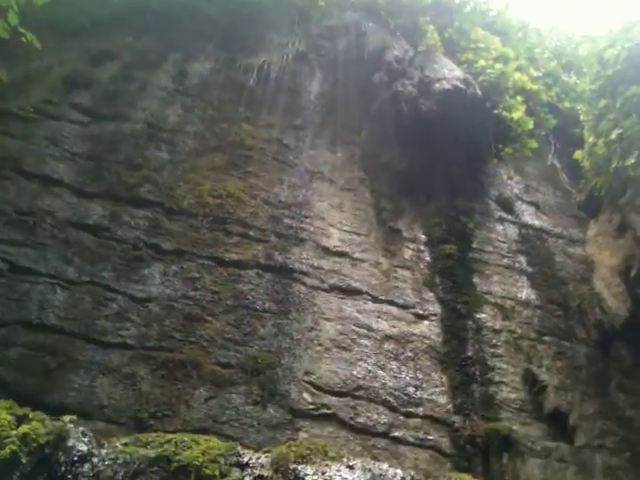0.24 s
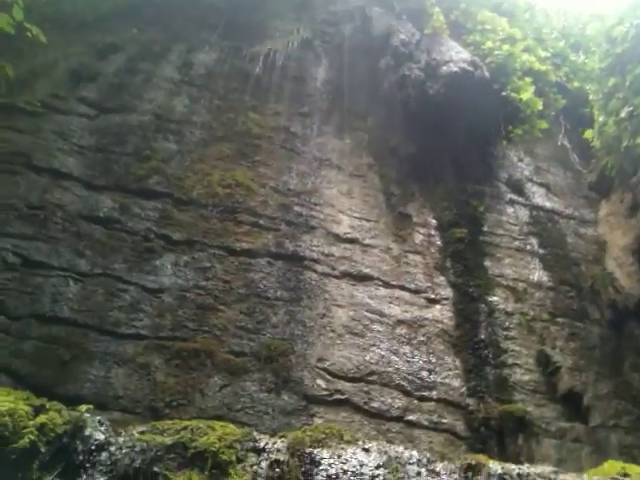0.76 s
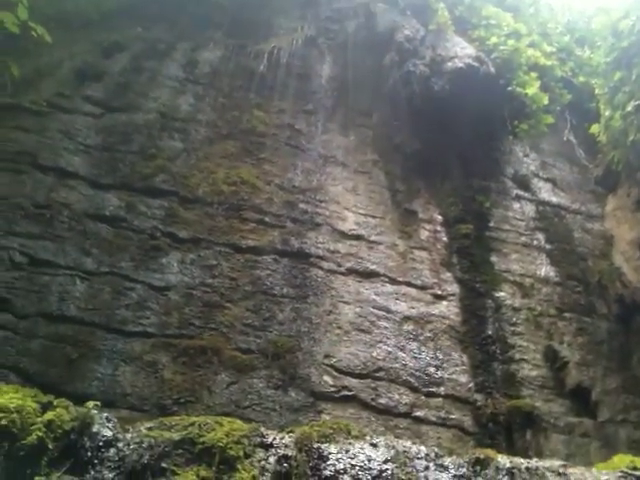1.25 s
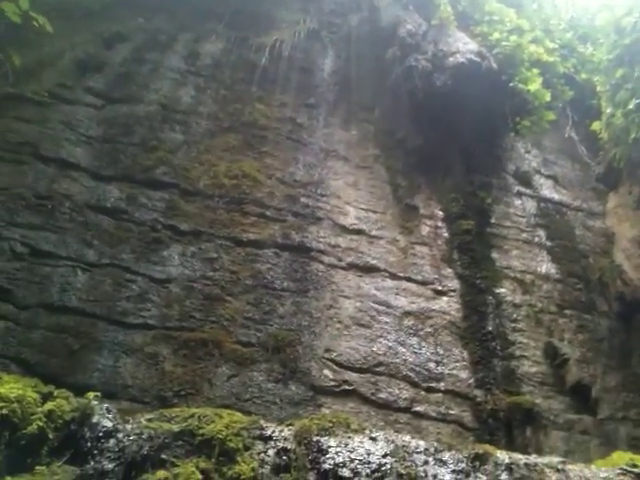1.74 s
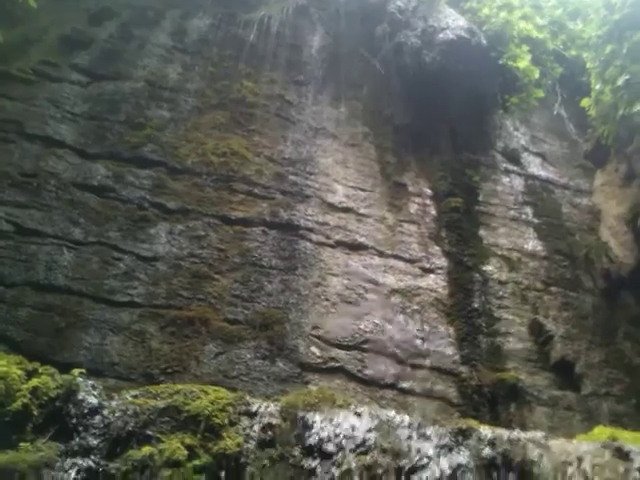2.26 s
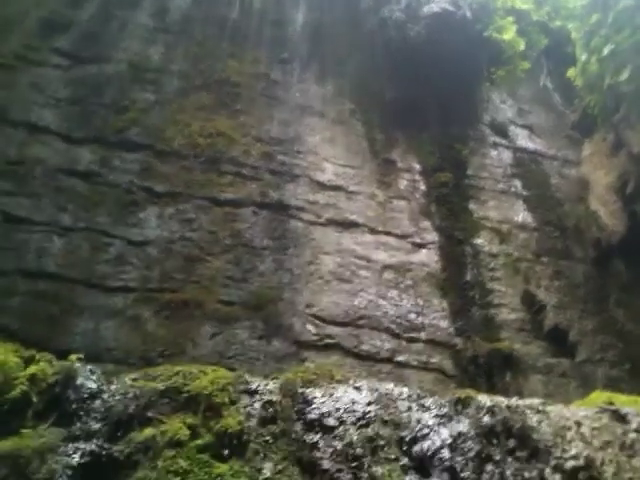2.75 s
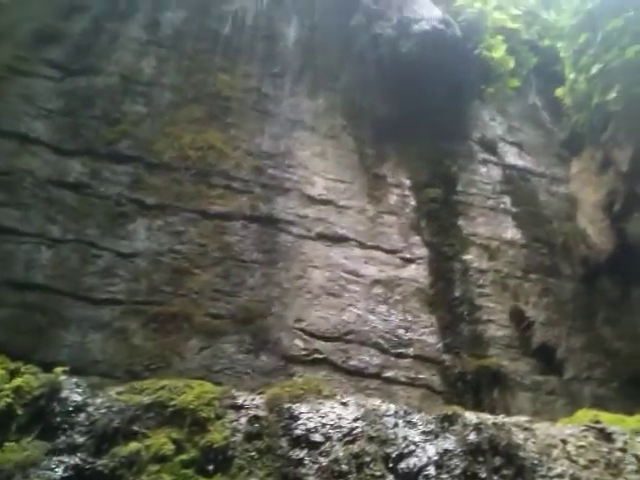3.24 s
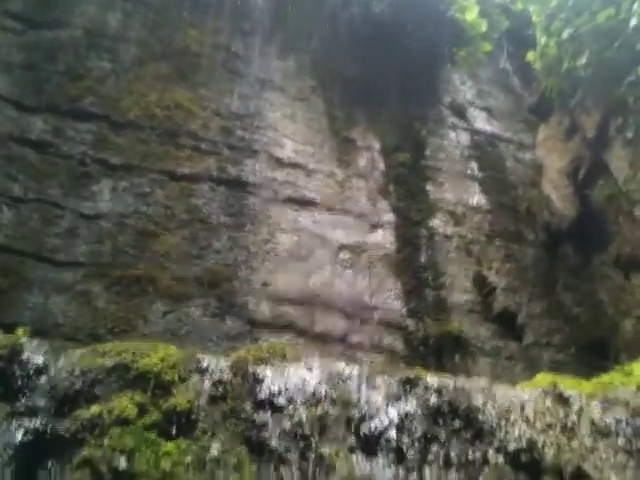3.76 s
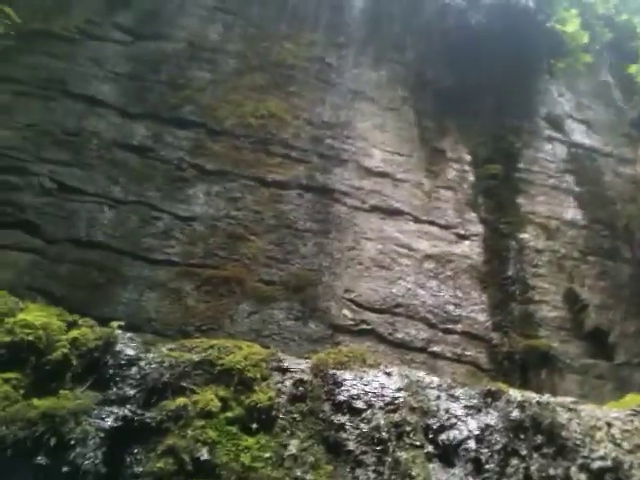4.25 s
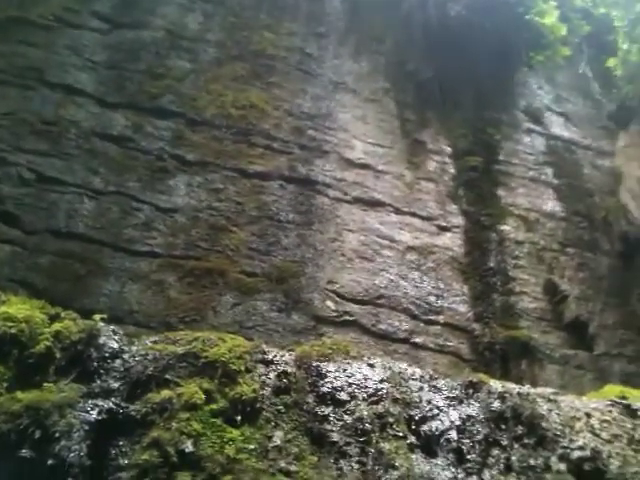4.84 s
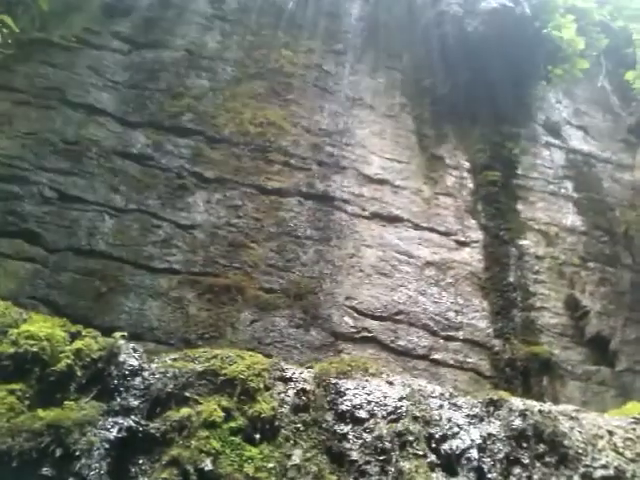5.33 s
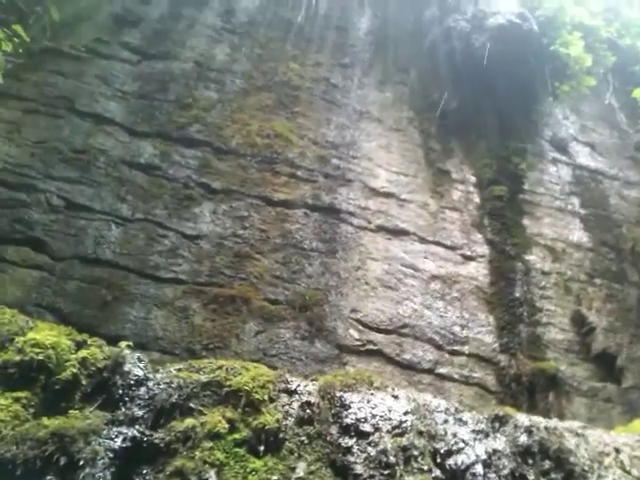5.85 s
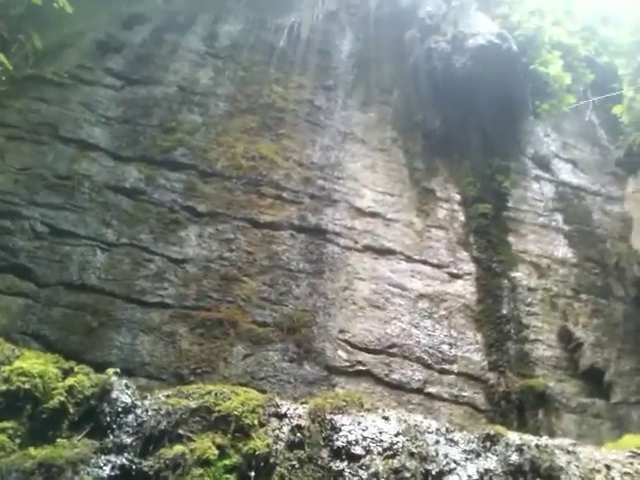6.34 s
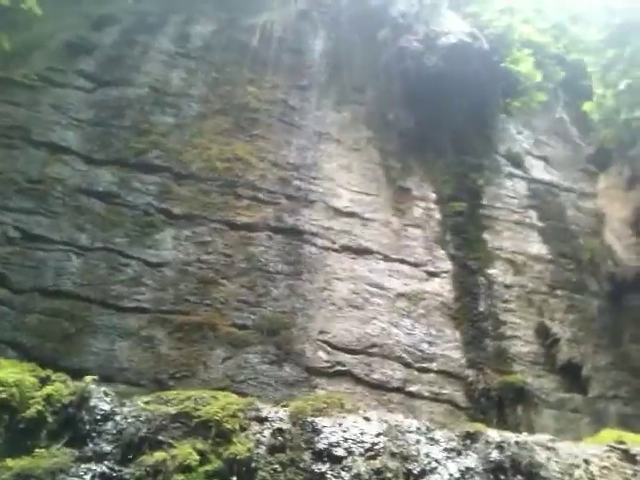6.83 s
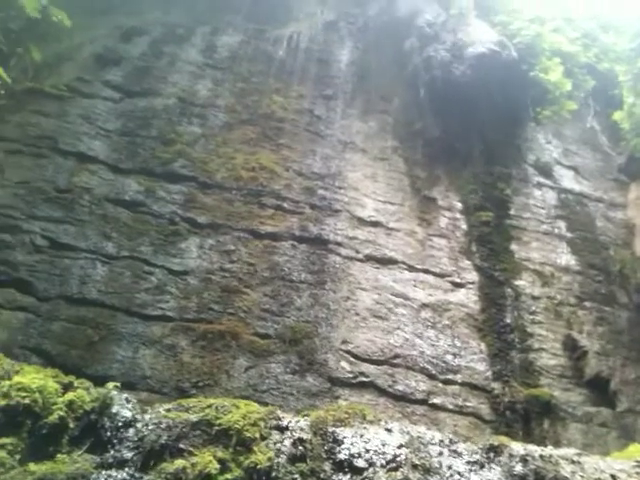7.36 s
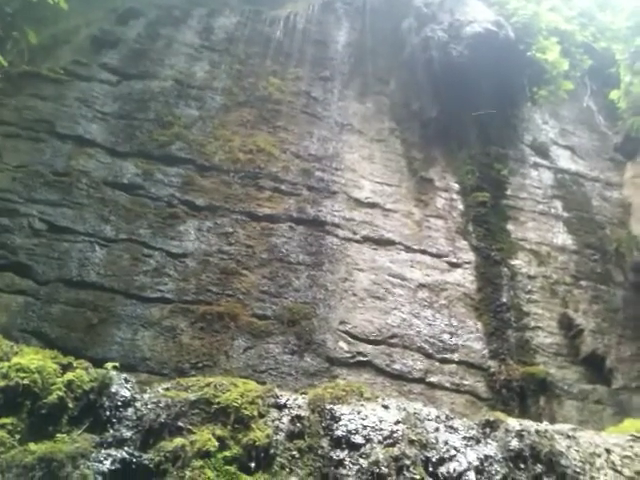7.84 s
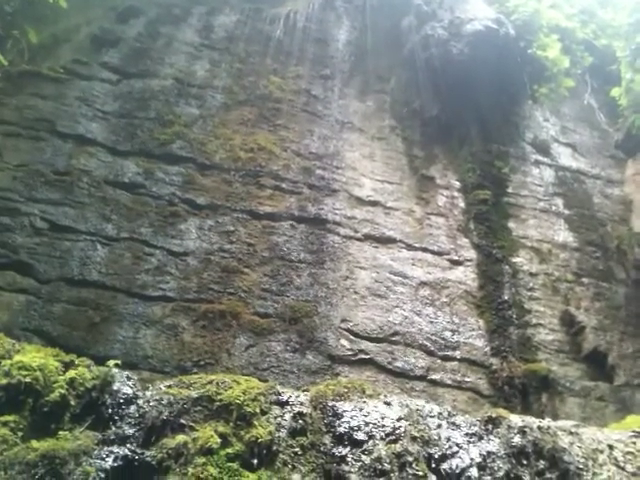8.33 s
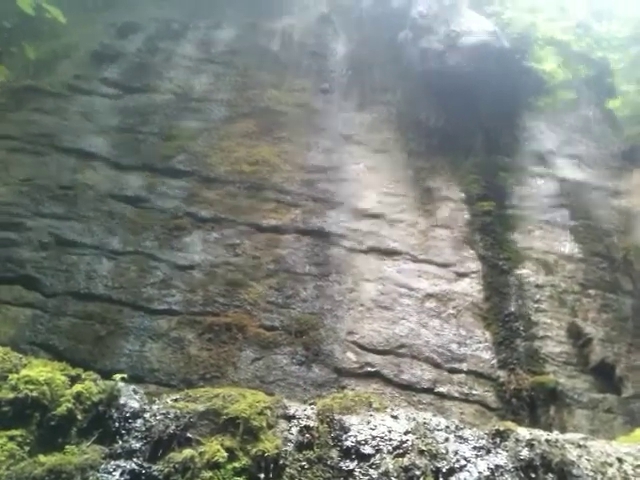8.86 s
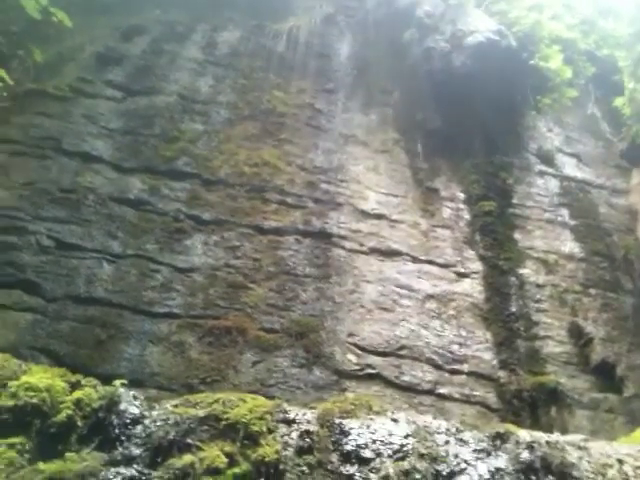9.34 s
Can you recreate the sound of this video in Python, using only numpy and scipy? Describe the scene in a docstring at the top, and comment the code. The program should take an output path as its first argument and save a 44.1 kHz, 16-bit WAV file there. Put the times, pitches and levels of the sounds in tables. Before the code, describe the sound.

Thin streams of water fall from a mossy overhang onto rocks outdoors, heard close on a hand-held microphone. For the whole nine and a half seconds, countless droplets merge into a steady, bright, lightly fluttering hiss over a faint duller wash. Nearer drops splash crisply, plop irregularly into shallow hollows and leave tiny pinging bubbles. The hiss shifts slightly in tone and swells a little around 4 seconds as the microphone turns. A very light drop touches the microphone at 3.8 seconds. Five heavy drops then strike it at about 4.5, 6.5, 7.5, 8.9 and 9.3 seconds, each a sharp tick with a short, dull thump, far louder than the water. From 5 seconds on, the runoff gives a few faint, brief gurgles, while the splashing and dripping carry on to the end.

```python
"""Outdoors, thin streams fall from a mossy overhang onto rocks, heard on a hand-held mono microphone.
From the start countless droplets merge into a hiss; nearer drops splash, plop into shallow hollows and
leave ringing bubbles. The hiss changes colour as the microphone sinks toward a ledge and, near 4 s, turns.
One light drop lands on the housing at 3.8 s and five heavy ones follow, each a tick and a dull thump.
From 5 s on the runoff gurgles now and then."""
import sys
import numpy as np
from scipy import signal
from scipy.fft import rfft, irfft, next_fast_len
from scipy.io import wavfile

SR = 44100
rng = np.random.default_rng(int(sys.argv[2]) if len(sys.argv) > 2 else 0)


def pcm_store(signal):
    """Save signal as 16-bit PCM."""
    levels = np.round(np.clip(np.atleast_2d(signal), -1, 1) * 32767)
    wavfile.write(sys.argv[1], SR, levels.astype(np.int16).T)


N = 422919
TIME = np.arange(N) / SR
FREQS = np.maximum(np.arange(N // 2 + 1) * SR / N, 1)


def hiss(droplets_per_s=8000, size_db=2.5, flutter_db=1.92, patchy_db=1.0):
    """Droplets click on the rocks over a blur of far ones; each register follows the flow and flutters."""
    # colour of the hiss: (f/Hz, relative level/dB)
    colour = [(700, -29), (1200, -41), (1400, -9.5), (1750, -5.5), (2400, -2.5), (3350, -4), (4300, -3),
              (5100, -1.5), (5750, -0.8), (6550, 0), (8300, -0.4), (10300, -4), (12800, -6), (15600, -10)]
    # registers: (centre f/Hz, share of the flow's swing, gain at the ledge/dB, gain when turned/dB)
    registers = [(2780, 0.59, -2.5, 1), (3700, 0.56, 1, -6), (6440, 0.72, 0, -3.5), (8150, 0.48, 0.5, 1.5),
                 (10000, 0.22, -1.5, -2.5)]
    sizes = from_db(size_db * np.minimum(rng.exponential(1, N), 4)) * rng.choice([-1, 1], N)
    clicks = rms_one(sizes * (rng.random(N) < droplets_per_s / SR))
    spectrum = rfft(coloured(clicks + rng.standard_normal(N), colour))
    centres = [hz for hz, *_ in registers]
    flutter = flutter_db * drift(13)
    out = np.zeros(N)
    for (_, share, ledge_db, turned_db), weights in zip(registers, np.eye(len(registers))):
        band = irfft(spectrum * np.interp(np.log(FREQS), np.log(centres), weights), N)
        flicker = from_db(share * flutter + patchy_db * drift(22))
        out += band * gain_at_microphone(share, ledge_db, turned_db) * flicker
    return out


def splashes(per_s=70, level_db=-55.5, centre_hz=4900, scatter=0.31, near_width_hz=2070):
    """A drop shatters on rock and throws a brief burst of spray with a colour of its own."""
    # splashes close to the microphone: (t/s, level/dB, length/s, centre f/Hz)
    near_splashes = [(0.433, -44.5, 0.021, 6600), (0.532, -42, 0.0059, 5700), (0.673, -50, .003, 6050),
                     (0.727, -45, 0.005, 1490), (0.97, -44, 0.0026, 5470), (1.097, -43, .003, 4700),
                     (1.255, -43.5, 0.017, 4900), (1.592, -44, .004, 2320), (1.637, -48, 0.013, 3900),
                     (1.776, -43, 0.0042, 5140), (1.797, -41, .002, 4000), (1.96, -42, 0.0027, 6200),
                     (2.099, -46, .004, 5000), (2.268, -50, 0.0073, 1450), (2.353, -43, 0.0053, 1600),
                     (2.293, -42, 0.0061, 5000), (2.35, -43.5, 0.0042, 5500), (3.92, -44.5, .012, 3800),
                     (4.114, -46.5, 0.021, 4230), (4.195, -42, 0.013, 7300), (4.199, -46, .012, 5000),
                     (4.265, -42.5, 0.0048, 2500), (4.582, -41, .003, 7700), (5.110, -40.5, 0.0025, 6770),
                     (5.26, -41.5, 0.0036, 2000), (5.366, -44, 0.016, 2470), (5.513, -39.5, 0.0022, 2890),
                     (5.835, -41, 0.0069, 6300), (6.114, -47, 0.0037, 5050), (7.072, -38.5, 0.0026, 6460),
                     (7.490, -42, .006, 6070), (7.497, -43, 0.018, 7500), (7.779, -42, 0.0037, 6570),
                     (7.822, -42.5, 0.017, 7300), (8.359, -40, .003, 6360), (8.494, -40, 0.0044, 6400),
                     (9.093, -40, 0.0027, 6200), (9.56, -39.5, 0.023, 6800)]
    out = np.zeros(N)
    for s, db, higher, longer in random_drops(per_s, spread_db=3.0):
        spray = burst(centre_hz * np.exp(scatter * higher), octaves=0.14, length_s=0.003 * 1.6 ** longer)
        add(out, s, from_db(level_db + db) * spray)
    for s, db, length_s, hz in near_splashes:
        add(out, s, from_db(db) * burst(hz, near_width_hz / hz, length_s))
    return out


def plops(scatter=0.068):
    """Drops plunge into water-filled hollows, each with its own range of pitch; near ones stand out."""
    # drops close by: (t/s, level/dB, f/Hz)
    near_drips = [(0.028, -49, 824), (0.097, -51, 850), (0.160, -52, 817), (0.238, -54, 497),
                  (0.242, -45, 880), (0.2905, -42, 826), (0.3483, -48, 814), (0.396, -46, 760),
                  (0.444, -47, 780), (0.507, -49, 816), (0.5243, -43, 830), (0.551, -48, 890),
                  (0.5915, -42, 815), (0.637, -54, 845), (0.73, -39.5, 1110), (0.901, -46, 820),
                  (0.93, -43.5, 1000), (0.969, -44.5, 1030), (1.001, -45.5, 820), (1.043, -48, 761),
                  (1.093, -50, 991), (1.171, -42.5, 860), (1.197, -49, 933), (1.231, -51, 949),
                  (1.251, -47, 725), (1.353, -47, 814), (1.551, -50, 792), (1.6224, -36, 820),
                  (1.6613, -43, 860), (1.734, -49, 856), (1.775, -48, 848), (1.8022, -47, 800),
                  (1.865, -49, 865), (1.9885, -42.5, 825), (2.055, -55, 468), (2.064, -50, 794),
                  (2.1367, -45, 830), (2.3153, -47, 800), (2.3518, -41.5, 790), (2.416, -46, 935),
                  (2.430, -48, 834), (2.476, -45.5, 890), (2.5115, -40.5, 800), (2.6646, -42.5, 800),
                  (2.679, -51, 816), (2.697, -44.5, 796), (2.7355, -46.5, 835), (2.79, -48.5, 814),
                  (2.891, -45, 1090), (3.07, -48, 480), (3.0755, -43.5, 764), (3.424, -51, 1092),
                  (3.5825, -46, 810), (3.6495, -43, 775), (3.688, -51, 790), (3.7253, -46.5, 815),
                  (3.750, -47.5, 1000), (3.9345, -47.5, 885), (4.027, -46.5, 966), (4.134, -44, 990),
                  (4.225, -44.5, 910), (4.2465, -47.5, 760), (4.327, -47.5, 484), (4.340, -48, 761),
                  (4.3653, -44, 840), (4.4315, -45, 760), (4.541, -46, 800), (4.6855, -49, 810),
                  (4.733, -48, 779), (4.809, -46, 722), (4.925, -46.5, 992), (5.106, -50, 800),
                  (5.2928, -41, 850), (5.392, -45.5, 795), (5.615, -52, 859), (5.725, -48, 830),
                  (5.766, -49, 742), (5.808, -40.5, 920), (5.844, -40.5, 850), (5.875, -41.5, 790),
                  (5.899, -42.5, 814), (6.374, -48, 778), (6.392, -52, 792), (6.408, -49.5, 530),
                  (6.4145, -42, 880), (6.438, -46, 980), (6.4875, -44, 843), (7.245, -48, 920),
                  (7.335, -52.5, 500), (7.340, -45, 1000), (7.5005, -42.5, 910), (7.669, -48, 1081),
                  (7.6935, -47, 780), (7.883, -46, 885), (7.9515, -44, 830), (7.9775, -46, 856),
                  (8.007, -47, 876), (8.318, -47.5, 497), (8.3237, -41.5, 820), (8.4812, -43, 830),
                  (8.5665, -46, 830), (8.602, -48, 798), (8.636, -47, 795), (8.690, -47, 1100),
                  (8.727, -46.5, 450), (8.890, -47.5, 856), (8.928, -44, 1083), (9.044, -51, 483),
                  (9.0525, -47.5, 820), (9.181, -51, 867), (9.2075, -48, 790), (9.224, -48, 848),
                  (9.252, -42, 890), (9.569, -46, 786)]
    # hollows in the rock: (f/Hz, level/dB, drops per second)
    hollows = [(461, -64, 40), (816, -57, 44), (1100, -56.5, 18), (1506, -55.5, 17)]
    out = np.zeros(N)
    for s, db, hz in near_drips:
        add(out, s, from_db(db) * plop(hz))
    for hz, level_db, per_s in hollows:
        for s, db, higher, _ in random_drops(per_s, spread_db=2.5):
            add(out, s, from_db(level_db + db) * plop(hz * np.exp(scatter * higher)))
    return out


def plop(hz, cycles=1.32, slap_db=-8.5):
    """A drop slaps shallow water and its cavity rings a low, quickly damped note; no two are alike."""
    longer, wetter = np.clip(rng.standard_normal(2), -1.5, 1.5)
    note = ring(hz, cycles * np.exp(0.17 * longer), rise=0.0025)
    slap = from_db(slap_db + 0.5 * wetter) * burst(hz, octaves=0.69, length_s=0.0035)
    out = np.zeros(max(len(note), len(slap)))
    add(out, 0, note)
    add(out, 0, slap)
    return out


def bubbles(per_s=130, level_db=-53, centre_hz=2300, scatter=0.177, rise=0.013):
    """Air pockets patter in the runoff and ping close by, rising in pitch as they near the surface."""
    # bubbles close by: (t/s, peak level/dB, f/Hz, cycles to ring up)
    near_bubbles = [(0.199, -42, 2550, 4.5), (0.729, -45, 1510, 3.7), (0.942, -47, 4910, 4),
                    (0.9705, -36, 5370, 3.9), (0.992, -46, 2030, 5), (1.082, -37.5, 2980, 2.8),
                    (1.148, -41, 2290, 2), (1.7775, -38, 5200, 4), (1.817, -43, 2500, 3),
                    (2.396, -44, 2550, 3), (2.4937, -42.5, 2600, 4.5), (3.404, -43, 2390, 2),
                    (4.044, -40, 2670, 2), (4.632, -45, 2410, 4), (4.912, -40, 2670, 4.2),
                    (4.970, -45, 2340, 6), (5.837, -36.5, 2440, 3.2), (6.1105, -36.5, 4900, 4.5),
                    (6.166, -42, 2540, 2.5), (6.355, -40, 2660, 2), (6.867, -41.5, 2400, 4.5),
                    (7.414, -46, 2410, 3), (7.4939, -40, 2800, 4), (8.500, -44, 2540, 3),
                    (8.838, -45, 2530, 4), (8.855, -41.5, 2500, 3.5), (9.0925, -39, 5050, 4),
                    (9.312, -42, 2300, 4.5), (9.534, -42.5, 1900, 3)]
    # the farther patter: (share of the flow's swing, gain at the ledge/dB, gain when turned/dB)
    runoff = (0.28, -2.1, 1.1)
    near, far = np.zeros((2, N))
    for s, db, hz, cycles in near_bubbles:
        add(near, s, from_db(db) * ring(hz, cycles, rise))
    for s, db, higher, longer in random_drops(per_s, spread_db=1.0):
        ping = ring(centre_hz * np.exp(scatter * higher), cycles=1.5 * 1.97 ** longer, rise=rise)
        add(far, s, from_db(level_db + db) * ping)
    return near + far * gain_at_microphone(*runoff)


def microphone_hits(rest_hz=128):
    """A drop ticks, snaps and knocks on the housing; its pressure pulse swings out with falling pitch."""
    # drops on the microphone: (t/s, thump level/dB, starting f/Hz, swell/s, glide/s,
    # tick level/dB, snap level/dB, knock level/dB, knock f/Hz)
    hits = [(3.814, -44, 400, 0.0022, 0.0027, -58, -60, -64, 600),
            (4.5209, -18.5, 342, 0.0034, 0.0042, -34, -45, -29.5, 560),
            (6.545, -14.5, 368, 0.0033, 0.0038, -33.5, -37, -30, 517),
            (7.4606, -11.5, 477, 0.0025, 0.0029, -27.5, -37.5, -29, 760),
            (8.9455, -12, 421, 0.0029, 0.0037, -28.5, -43, -35, 602),
            (9.328, -12, 477, 0.0027, 0.0031, -28, -42.5, -36, 700)]
    # colour of the tick on the housing: (f/Hz, relative level/dB)
    tick_colour = [(800, -44), (2300, -16), (4500, -14), (6300, -3), (8200, 11), (9600, 2), (11000, -1),
                   (16000, -14)]
    thumps, tick_envelope = np.zeros((2, N))
    for s, db, start_hz, swell_s, glide_s, tick_db, snap_db, knock_db, knock_hz in hits:
        envelope = swell(swell_s, steepness=1.68)
        t = TIME[:len(envelope)]
        turns = rest_hz * t + (start_hz - rest_hz) * glide_s * (1 - np.exp(-t / glide_s))
        add(thumps, s, from_db(db) * envelope * np.sin(2 * np.pi * turns))
        add(thumps, s, from_db(knock_db) * ring(knock_hz, cycles=0.76))
        add(thumps, s, from_db(snap_db) * burst(hz=2100, octaves=0.41, length_s=0.0018))
        add(tick_envelope, s, from_db(tick_db) * swell(peak_s=0.0004, steepness=1))
    return thumps + tick_envelope * coloured(rng.standard_normal(N), tick_colour)


def ringing_splatter(width_hz=750, lowest_hz=2800, flutter_db=1.5):
    """Part of the splatter gathers in two broad, fluttering resonances."""
    # the lower one shifts as the microphone moves and turns: (t/s, centre f/Hz, level/dB)
    lower = [(0, 4980, -60), (1.4, 4900, -55), (2.4, 4870, -53.5), (2.6, 3510, -56), (3.2, 4187, -53.5),
             (3.9, 3800, -55), (4.13, 4200, -54.5), (4.3, 5250, -54), (4.6, 5150, -58), (5.8, 5200, -58),
             (6.4, 5200, -59.5), (7.1, 5500, -56), (7.8, 5500, -59), (9.59, 5600, -58)]
    # the higher resonance: (t/s, centre f/Hz, level/dB)
    higher = [(0, 6750, -56), (0.5, 6750, -55.5), (1.7, 6730, -56), (2.6, 6900, -58), (3.9, 7380, -62),
              (4.2, 7880, -59), (5.3, 8224, -63), (5.7, 7680, -63), (6.1, 6550, -53), (7.0, 6500, -57),
              (7.9, 6520, -51.5), (8.6, 6570, -55), (9.59, 6800, -54)]
    out = np.zeros(N)
    for track in (lower, higher):
        hz, db = in_time(track)
        phase = 2 * np.pi * np.cumsum(hz) / SR
        band = rms_one(drift(width_hz) * np.cos(phase) + drift(width_hz) * np.sin(phase))
        out += low_cut(band, lowest_hz, order=2) * from_db(db + flutter_db * drift(7.6))
    return out


def gurgles(per_s=220, spread_db=0.5, scatter=0.1):
    """The runoff swallows air and lets it go as a quick run of bubbles of like size."""
    # runs of bubbles: (t/s, length/s, peak level of a bubble/dB, f/Hz)
    runs = [(5.123, .06, -49.5, 2530), (5.331, 0.12, -49.5, 2530), (5.59, 0.054, -54, 2530),
            (5.838, .025, -47, 2660), (6.704, .06, -49, 2660), (8.751, 0.16, -49.5, 2570)]
    out = np.zeros(N)
    for s, length_s, db, hz in runs:
        count = max(round(per_s * length_s), 1)
        for k, (late, louder, higher) in enumerate(rng.standard_normal((count, 3))):
            bubble = ring(hz * np.exp(scatter * higher), cycles=2.4)
            add(out, s + (k + late / 2) / per_s, from_db(db + spread_db * louder) * bubble)
    return out


def far_wash(level_db=-58.0, flutter_db=2.5):
    """Water farther off blurs into a dull, fluttering wash."""
    # colour of the wash: (f/Hz, relative level/dB)
    colour = [(50, -1), (100, -10), (160, -6.5), (280, -8), (460, -3), (620, -4.5), (770, 2), (1100, 1.5),
              (1280, 0.5), (1500, 0), (2200, -10.5)]
    return from_db(level_db + flutter_db * drift(11.0)) * coloured(rng.standard_normal(N), colour)


def handling():
    """The hand shifts its grip on the microphone with faint, dead knocks."""
    # knocks on the housing: (t/s, level/dB, f/Hz)
    knocks = [(2.20, -67, 110), (3.049, -57, 150), (4.04, -62, 175), (4.075, -60, 175)]
    out = np.zeros(N)
    for s, db, hz in knocks:
        add(out, s, from_db(db) * ring(hz, cycles=0.59))
    return out


def gain_at_microphone(share, ledge_db, turned_db):
    """Gain of one part of the water around its usual level, from the flow and the microphone's place."""
    # strength of the fall: (t/s, level/dB); only its swing counts
    flow = [(0.1, -50.5), (0.49, -48.5), (1.28, -49.5), (1.51, -47), (2.64, -48.5), (3.16, -47.5),
            (3.5, -50), (4.03, -47), (4.44, -43.5), (4.81, -46), (7.25, -46), (7.38, -45.5), (8.06, -44.5),
            (8.35, -44.4), (9.5, -44)]
    # the microphone sinks toward the ledge, then swings round: (t/s, nearness to the ledge, turn 0-1)
    path = [(0, 0.4, 0.06), (2.4, 0.2, 0.42), (2.65, 0.3, 0.33), (3.75, 1.2, 0.1), (4.0, 1, 0.6),
            (4.3, 0.7, 0.75), (5.4, 0.3, 0.7), (6.0, 0.4, 0.6), (6.7, 0.1, 1), (7.2, 0, 0.55),
            (9.59, 0.1, 1)]
    flow_db, = in_time(flow)
    nearness, turn = in_time(path)
    db = share * flow_db + ledge_db * nearness + turned_db * turn
    return from_db(db - db.mean())


def burst(hz, octaves, length_s):
    """Water shatters: a short swell of noise around a centre pitch, rms 1 at its height."""
    envelope = swell(length_s / 2, steepness=0.98)
    count = next_fast_len(len(envelope))
    bin_hz = np.arange(1, count // 2 + 2) * SR / count
    widths_away = np.log2(bin_hz / hz) / octaves
    phases = np.exp(2j * np.pi * rng.random(len(bin_hz)))
    noise = irfft(phases / (1 + widths_away ** 2), count)
    return envelope * rms_one(noise)[:len(envelope)]


def ring(hz, cycles, rise=0):
    """The damped note of an air pocket or a knock: it peaks after `cycles`; `rise` bends it upward."""
    envelope = swell(cycles / hz, steepness=0.65)
    turns = hz * TIME[:len(envelope)]
    bend = 1 + rise * (turns / cycles / 2 - 1)
    return envelope * np.sin(2 * np.pi * turns * bend)


def random_drops(per_s, spread_db):
    """Drops at chance moments: rows (t/s, relative level/dB, deviation of pitch, deviation of length)."""
    count = int(per_s * N / SR)
    louder, higher, longer = np.clip(rng.standard_normal((count, 3)), -2, 2).T
    return zip(rng.random(count) * N / SR, spread_db * louder, higher, longer)


def swell(peak_s, steepness):
    """An envelope that rises to 1 at peak_s and dies away."""
    u = TIME[:int(10 * peak_s * SR) + 2] / peak_s
    return (u * np.exp(1 - u)) ** steepness


def coloured(x, spectrum):
    """Give a steady texture a (f/Hz, level/dB) spectrum; rms 1."""
    hz, db = np.transpose(spectrum)
    gain = from_db(np.interp(np.log(FREQS), np.log(hz), db))
    return rms_one(irfft(rfft(x) * gain, N))


def drift(rate_hz):
    """Random wavering, mostly slower than rate_hz; rms 1."""
    return rms_one(irfft(rfft(rng.standard_normal(N)) / (1 + (FREQS / rate_hz) ** 2), N))


def in_time(rows):
    """The columns of a curve, joined by straight lines."""
    s, *columns = np.transpose(rows)
    return [np.interp(TIME, s, column) for column in columns]


def add(out, s, sound):
    """Mix a short sound in at time s."""
    start = int(np.clip(round(s * SR), 0, N - 1))
    out[start:start + len(sound)] += sound[:N - start]


def low_cut(x, hz, order):
    """Roll off what lies below hz."""
    return signal.sosfilt(signal.butter(order, hz, "high", fs=SR, output="sos"), x)


def from_db(db):
    """Decibels to gain."""
    return 10 ** (np.asarray(db) / 20)


def rms_one(x):
    """Scale to unit power."""
    return x / np.sqrt(np.mean(x ** 2) + 1e-20)


def scene(hiss_db=-46.5, lowest_hz=136):
    """All the water, heard at one point; only touches on the microphone carry deep bass."""
    water = far_wash() + from_db(hiss_db) * hiss() + ringing_splatter()
    water += splashes() + plops() + bubbles() + gurgles()
    mono = low_cut(water, lowest_hz, order=4) + microphone_hits() + handling()
    return np.tile(mono, (2, 1))


def record(dry):
    """The treble is cut steeply above 15.9 kHz."""
    return signal.sosfilt(signal.ellip(12, 0.1, 80, 15900, fs=SR, output="sos"), dry)


dry = scene()
out = record(dry)
pcm_store(out)
```